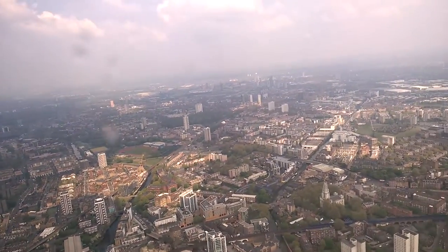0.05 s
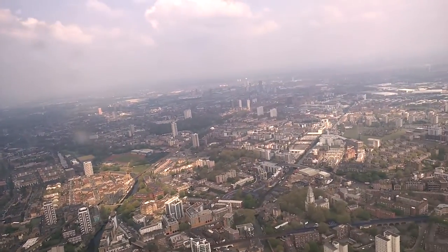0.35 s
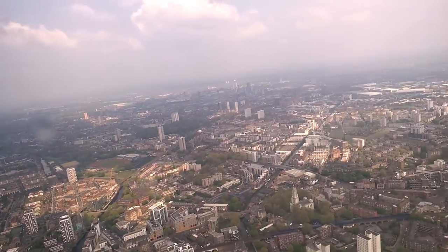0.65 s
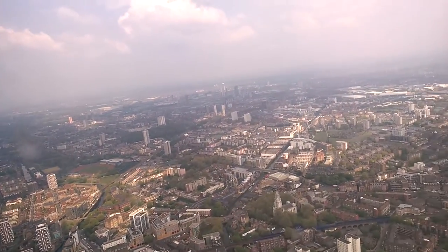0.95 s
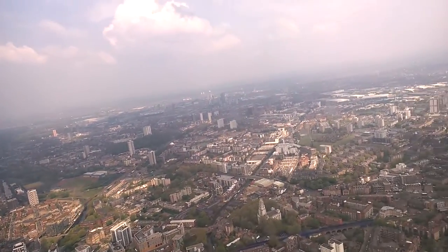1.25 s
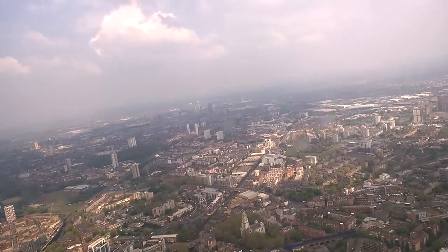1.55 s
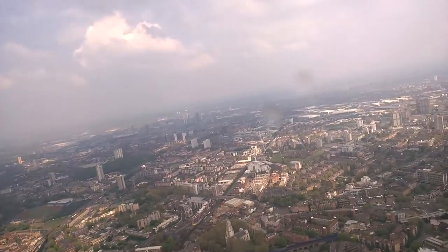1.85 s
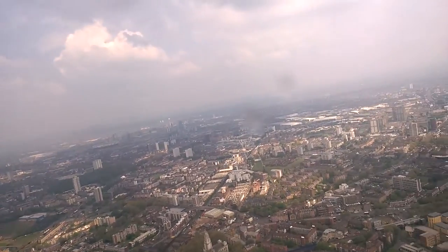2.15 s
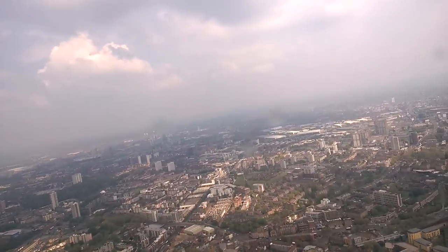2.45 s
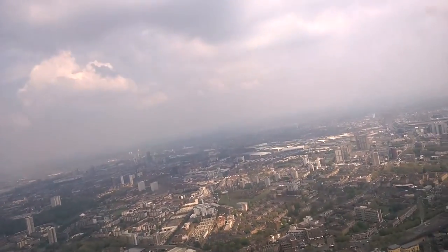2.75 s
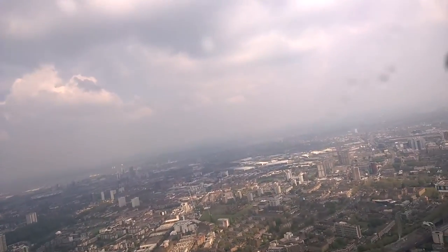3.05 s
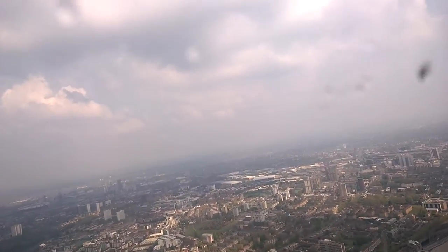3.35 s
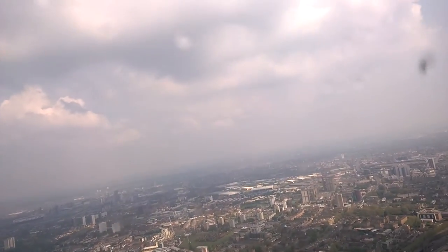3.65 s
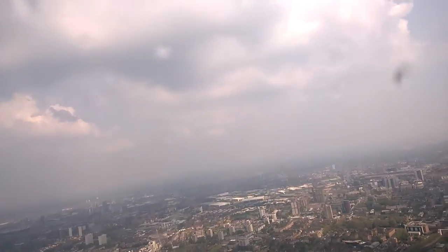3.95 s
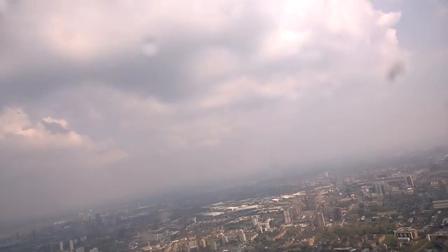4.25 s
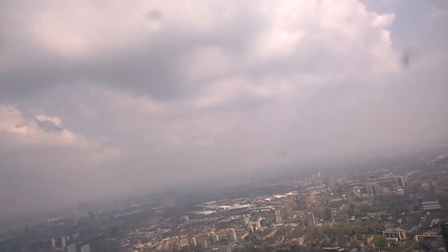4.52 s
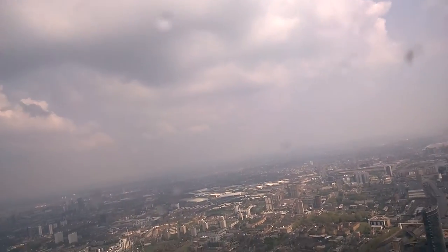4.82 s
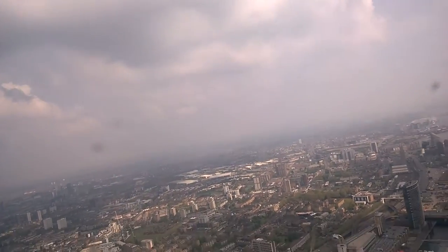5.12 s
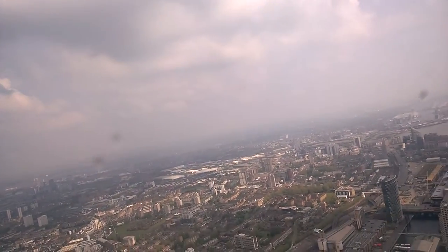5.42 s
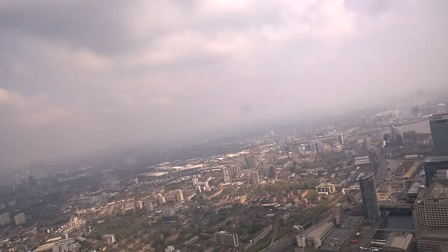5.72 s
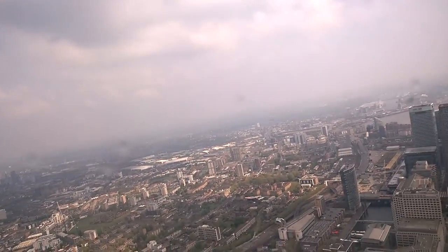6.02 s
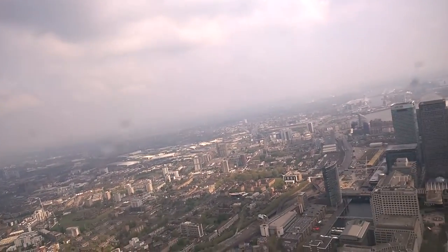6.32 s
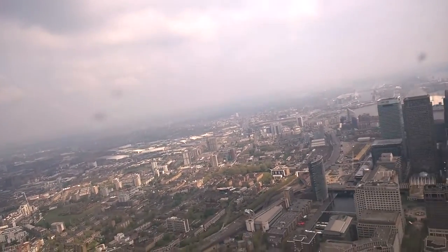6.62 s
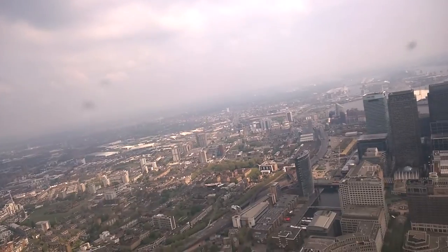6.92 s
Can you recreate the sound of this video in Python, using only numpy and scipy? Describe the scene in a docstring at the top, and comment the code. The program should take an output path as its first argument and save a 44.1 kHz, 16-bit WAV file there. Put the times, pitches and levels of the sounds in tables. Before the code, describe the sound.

A helicopter in flight is heard from inside its cabin, continuously for about seven seconds. The main sound is a deep, steady drone: the main rotor beats about twenty times a second, blending with the tail rotor and a shaft hum into a fast throb. Turbulent air rumbles and rushes around the microphone, pulsing with the blades. The beating and buffeting grow somewhat harder around 1.5 seconds and ease by 2.5 seconds. Well below the drone in level, several thin gearbox tones flutter and drift between left and right. Above them sit a soft hiss and two very high, wavering turbine whines. These whines swell slightly around 4.5 seconds, dip just before 6 seconds and return by 7 seconds. Overall pitch and loudness stay nearly constant to the end.

```python
"""Helicopter cabin in a banking turn

The main rotor of a light turbine helicopter thumps, beating against the tail rotor's drone and
a drive shaft's hum. Turbulent air roars over the cabin, pulsing with the blades. Meshing gear
teeth sing in thin tones, and two compressor whines waver high above."""
import sys
import numpy as np
from scipy.fft import rfft, irfft, next_fast_len
from scipy.io import wavfile
from scipy.ndimage import map_coordinates

SR = 44100
rng = np.random.default_rng(int(sys.argv[2]) if len(sys.argv) > 2 else 0)


def master_out(mix):
    """Clip the mix to full scale and print it as 16-bit PCM to the path in sys.argv[1]."""
    frames = np.transpose(np.atleast_2d(mix))
    ceiling = np.clip(frames, -1, 1)
    pcm = np.round(ceiling * 32767).astype(np.int16)
    wavfile.write(sys.argv[1], SR, pcm)


N = 316638


def amp(db):
    """Amplitude grows tenfold for every 20 dB."""
    return 10 ** (np.asarray(db) / 20)


def unit(x):
    """Normalisation to an rms of 1."""
    return x / np.sqrt(np.mean(x ** 2) + 1e-20)


def along(points, hz):
    """Interpolation of (Hz, value) points on a logarithmic frequency axis."""
    freqs, values = np.transpose(points)
    return np.interp(np.log(hz + 1), np.log(freqs + 1), values)


def curves(rows):
    """Linear interpolation in time: one value per sample for each column after the first."""
    times, *columns = np.transpose(rows)
    return [np.interp(np.arange(N) / SR, times, column) for column in columns]


def wobble(rate):
    """Smooth random modulation: a spline through `rate` Gaussian knots a second."""
    knots = rng.standard_normal(int(N * rate / SR) + 4)
    coarse = np.linspace(0, N, 8192)
    return np.interp(np.arange(N), coarse, map_coordinates(knots, [coarse * rate / SR]))


def angle(hz):
    """Phase is the time integral of frequency."""
    return 2 * np.pi * np.cumsum(hz) / SR


def filtered(x, response):
    """Linear filtering multiplies the spectrum by a frequency response."""
    size = next_fast_len(N + SR // 2)
    return irfft(rfft(x, size) * response(np.fft.rfftfreq(size, 1 / SR)), size)[..., :N]


def tone(phase, pan_db, lead):
    """Interaural differences place a sinusoid: the left is pan_db louder and `lead` radians ahead."""
    side = np.array([[.5], [-.5]])
    gain = amp(side * pan_db)
    return 2 * gain / np.hypot(*gain) * np.cos(phase + side * lead)


def harmonics(phase, orders, flutter_rate, flutter_db=.9, slip_rad=.1):
    """A periodic force radiates a harmonic series; turbulence modulates each level and phase."""
    total = np.zeros(N)
    for order, db in orders:
        gain = amp(db + flutter_db * wobble(flutter_rate))
        total += gain * np.cos(round(order) * phase + slip_rad * wobble(flutter_rate))
    return np.sqrt(2) * total


# Each blade's deep push. Each row: multiple of the blade rate, level in dB before the resonance.
BLADE_PUSH = [(1, -27.5), (2, -27)]
# Its sharper slap. Each row: multiple of the blade rate, level in dB before loading and resonance.
BLADE_SLAP = [(3, -33.5), (4, -41.5), (5, -38), (6, -44.5), (7, -44.5), (10, -29), (11, -29), (12, -29),
              (13, -28.5), (15, -24.5)]


def main_rotor(blade, load_db):
    """Forced resonance: the cabin air booms after each blade, whose slap grows with loading."""
    push = harmonics(blade, BLADE_PUSH, flutter_rate=6.4)
    slap = amp(load_db) * harmonics(blade, BLADE_SLAP, flutter_rate=5)
    boom_hz, width_hz = 70, 14
    return filtered(push + slap, lambda hz: boom_hz ** 2 / (boom_hz ** 2 - hz ** 2 + 1j * hz * width_hz))


# Two blades make the even orders strong. Each row: multiple of the tail's turn rate, level in dB.
TAIL_ORDERS = [(1, -32.5), (2, -20), (4, -36.5), (6, -36), (8, -51), (10, -56), (13, -58)]


def tail_rotor(blade, turns_per_pass=1.7672):
    """Beating: the tail's blade rate lies between two main harmonics, so the sum throbs near 10 Hz."""
    return harmonics(turns_per_pass * blade, TAIL_ORDERS, flutter_rate=7)


def drive_shaft(blade, turns_per_pass=5.1826):
    """A rotating shaft hums at its rotation frequency."""
    return harmonics(turns_per_pass * blade, [(1, -27.0)], flutter_rate=5)


# Likeness of the air noise at the two ears. Each row: frequency in Hz, correlation.
EAR_CORRELATION = [(100, 0.88), (200, 0.91), (350, 0.47), (550, 0.68), (800, 0.42), (1100, -0.18),
                   (1600, -0.025), (2500, 0.018), (10000, -0.15)]
# Its lean to one side. Each row: frequency in Hz, left minus right in dB.
EAR_BALANCE = [(60, 0.5), (300, 1), (400, 1), (600, -1), (900, 2), (1100, 3.5), (1500, 8), (2200, -2.5),
               (2800, 5.5), (4200, -1.5), (6000, 0), (8300, 4), (9500, -2), (10600, -0.5), (14000, -4.5)]


def air_noise(spectrum):
    """Partial coherence: cabin noise of rms 1, alike at both ears in the bass, unrelated in the treble."""
    def mid_and_side(hz):
        spread = np.arccos(np.clip(along(EAR_CORRELATION, hz), -1, 1)) / 2
        return amp(along(spectrum, hz)) * np.array([np.cos(spread), np.sin(spread)])

    mid, side = filtered(rng.standard_normal((2, N)), mid_and_side)
    ears = np.array([mid + side, mid - side])
    return unit(filtered(ears, lambda hz: amp(np.array([[.5], [-.5]]) * along(EAR_BALANCE, hz))))


# Four bands of air noise. Each row: frequency in Hz, relative spectral density in dB.
RUMBLE_SPECTRUM = [(8, -18), (22, -18), (33, -3.5), (60, 3), (95, -0.5), (130, -4.5), (155, -7),
                   (205, -10.5), (260, -23.5), (600, -56)]
PANEL_SPECTRUM = [(110, -28), (170, 2.5), (215, 0), (245, -2), (305, -2), (370, -10.5), (450, -18.5),
                  (800, -48.5)]
RUSH_SPECTRUM = [(150, -5.5), (330, -8), (450, 1.5), (640, -1), (800, -4.5), (1100, -9), (1700, -13),
                 (2600, -15.5), (3600, -20), (4800, -20.5), (5600, -25.5), (9000, -39.5)]
HISS_SPECTRUM = [(3000, -13), (5500, -9), (7500, 2), (9000, 6.5), (10500, 6.5), (12000, -1), (15500, -16)]


def airflow(blade, load_db):
    """Turbulent excitation: downwash buffets the panels, harder under load; the slipstream rushes."""
    blade_pulse = unit(((1 + np.cos(blade)) / 2) ** 4) - .5
    rumble = amp(-23 + 1.6 * wobble(4.24)) * air_noise(RUMBLE_SPECTRUM)
    buffet_db = -34 + .55 * load_db + 2.2 * blade_pulse + .45 * wobble(13)
    panels = amp(buffet_db) * air_noise(PANEL_SPECTRUM)
    rush_db = -40 + .5 * blade_pulse + .24 * wobble(9) + .077 * wobble(1.8)
    rush = amp(rush_db) * air_noise(RUSH_SPECTRUM)
    hiss = amp(-52.5 + .91 * wobble(17)) * air_noise(HISS_SPECTRUM)
    return rumble + panels + rush + hiss


# The pinion's tone recedes midway and returns. Each row: time in seconds, level in dB.
PINION_LEVEL = [(0, -51), (1.1, -54.5), (2, -51), (3.1, -50), (3.9, -55), (4.75, -56), (5.1, -50.5),
                (7.18, -52.5)]


def pinion(blade, cycles_per_pass=88.1):
    """Periodic tooth contact gives the input pinion a thin tone, heard mostly on the left."""
    level_db, = curves(PINION_LEVEL)
    return amp(level_db + .5 * wobble(15)) * tone(cycles_per_pass * blade, pan_db=11, lead=-1.42)


# The bright fifth mesh harmonic wanders from left to right. Each row: time in seconds, level in dB,
# left minus right in dB, left lead in radians.
BRIGHT_HARMONIC = [(0, -56, 1, 1), (.5, -53.5, 8, 2.3), (1.4, -55, -5, 2.8), (2.6, -55.5, -3, 2.5),
                   (3.2, -51, -11, 2.4), (5.2, -58.5, -15, 1.7), (5.9, -53, -13, 1.7),
                   (7.18, -62.5, -7, 1.8)]
# Drifting, swelling harmonics. Each row: multiple of the mesh rate, first and last level in dB, first
# and last left minus right in dB, left lead in radians, throb depth in dB, swell depth in dB,
# swell period in seconds, time of a crest in seconds.
MESH_HARMONICS = [(2, -56, -48.5, -0.5, 9.5, 2.38, 4.5, 0.7, 2.1, 5.6),
                  (3, -55.5, -62, 9, 1, 2.17, -0.5, 3, 5.2, 1.9),
                  (4, -61, -57, 7, -6, 1.2, .5, 2.5, 2.3, 2.82),
                  (6, -63, -63.5, 6, -3, 1.9, 1, 1.5, 2.1, 3.04)]
# The mesh's fundamental and its faint high harmonics, fluttering separately at each ear.
# Each row: multiple of the mesh rate, level in dB.
DIFFUSE_HARMONICS = [(1, -56), (7, -70), (8, -75), (10, -77)]


def gearbox(blade, cycles_per_pass=33.32):
    """Amplitude modulation: meshing teeth sing under a load that varies once per rotor turn."""
    mesh = cycles_per_pass * blade
    throb = -np.cos(blade / 3)  # three blades to a turn
    bright_db, bright_pan_db, bright_lead = curves(BRIGHT_HARMONIC)
    bright_gain = amp(bright_db + 1.7 * wobble(22))
    tones = bright_gain * tone(5 * mesh + .24 * wobble(22), bright_pan_db, bright_lead)
    for (order, first_db, last_db, first_pan_db, last_pan_db, lead,
         throb_db, swell_db, period_s, crest_s) in MESH_HARMONICS:
        swell = np.cos(2 * np.pi * (np.arange(N) / SR - crest_s) / period_s)
        level_db = np.linspace(first_db, last_db, N) + swell_db * swell
        flutter = unit(amp(throb_db * throb + 1.9 * wobble(22)))
        pan_db = np.linspace(first_pan_db, last_pan_db, N) + 1.4 * wobble(1.61)
        tones += amp(level_db) * flutter * tone(round(order) * mesh + .38 * wobble(22), pan_db, lead)
    diffuse = [harmonics(mesh, DIFFUSE_HARMONICS, flutter_rate=9, flutter_db=3.5, slip_rad=.53)
               for ear in range(2)]
    return tones + np.array(diffuse)


def whine(centre_hz, stray_hz, line_db, skirt_db, skirt_hz):
    """Spectral broadening: turbulent intake air scatters a wavering blade tone into a skirt of noise."""
    phase = angle(centre_hz + stray_hz * (.4 * wobble(15) + wobble(130)))
    blur_rad = stray_hz / 30  # rough air blurs the path to each ear differently
    line = np.array([amp(1.2 * wobble(40)) * np.cos(phase + blur_rad * wobble(60)) for ear in range(2)])
    noise = rng.standard_normal((2, N))
    scatter = unit(filtered(noise, lambda hz: (hz < 2000) / (1 + (hz / skirt_hz) ** 2) ** .71))
    line = unit(amp(1.8 * wobble(14)) * line)
    skirt = unit(scatter * np.cos(phase))
    return amp(line_db) * line + amp(skirt_db) * skirt


# The compressor eases off while the rotor runs fast, then picks up.
# Each row: time in seconds, frequency of the lower whine in Hz.
COMPRESSOR_PITCH = [(0, 8520), (.5, 8520), (1, 8478), (2, 8455), (2.7, 8465), (3.2, 8530), (4.4, 8512),
                    (7.18, 8508)]
# Both whines swell, then fade for a moment. Each row: time in seconds, gain of their pure tones in dB.
WHINE_GAIN = [(0, 0.5), (.8, -2), (1.15, -1.5), (3.9, 2), (4.5, 4), (5.4, -1), (5.85, -6.5), (7, 1.5)]


def compressor():
    """Blade-passing tones: two follow shaft speed, purest when slowest; a faint third lies below."""
    hz, = curves(COMPRESSOR_PITCH)
    gain_db, = curves(WHINE_GAIN)
    rough_hz = .302 * (hz - hz.min())  # intake air grows rougher with speed
    stray_hz = 10.66 + rough_hz
    low_db = -55.3 + gain_db - .05 * rough_hz + 2.4 * wobble(3.09)
    high_db = -55 + gain_db - .14 * rough_hz + 1.1 * wobble(2.96)
    upper_ratio, third_hz = 1.1825, 5205
    low = whine(hz, stray_hz, low_db, skirt_db=-58, skirt_hz=120) * amp([[1.2], [-1.2]])
    high = whine(upper_ratio * hz, stray_hz, high_db, skirt_db=-56, skirt_hz=189) * amp([[-.8], [.8]])
    third = amp(-71 + 2.2 * wobble(12)) * tone(angle(third_hz + 14 * wobble(60)), pan_db=11, lead=1.4)
    return low + high + third


# Main rotor speed. Each row: time in seconds, blade passes per second.
BLADE_RATE = [(0, 19.645), (1.2, 19.675), (2.6, 19.66), (3.4, 19.635), (7.18, 19.635)]
# Blade loading, greatest early in the turn. Each row: time in seconds, relative loading in dB.
BLADE_LOADING = [(0, 2), (.8, 1.5), (1.5, 7), (2.1, 2), (2.55, -4), (4.4, .5), (5.7, -2.5), (6.2, .5),
                 (7.18, -5)]


def scene():
    """Superposition of all sources, with the drive train phase-locked to the main rotor's blades."""
    blade_hz, = curves(BLADE_RATE)
    load_db, = curves(BLADE_LOADING)
    line_up_s = 1.2207  # both rotors and the drive shaft are in phase here
    blade = angle(blade_hz)
    blade -= blade[round(line_up_s * SR)]
    rotors = main_rotor(blade, load_db) + tail_rotor(blade) + drive_shaft(blade)
    lean_left = amp([[.4], [-.4]])
    return rotors * lean_left + airflow(blade, load_db) + pinion(blade) + gearbox(blade) + compressor()


def record(dry):
    """Band limiting: an ideal low-pass filter removes the highest treble."""
    return filtered(dry, lambda hz: hz < 15750)


dry = scene()
out = record(dry)
master_out(out)
```